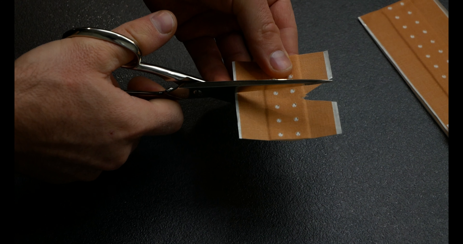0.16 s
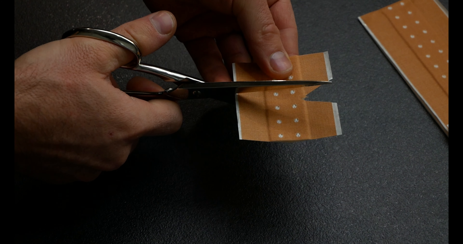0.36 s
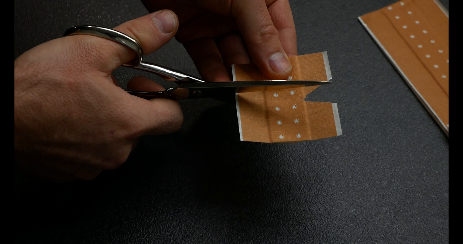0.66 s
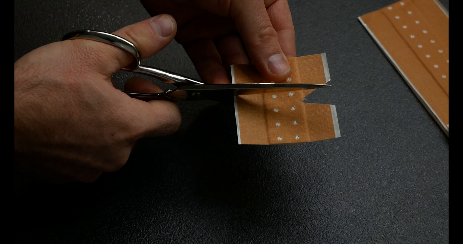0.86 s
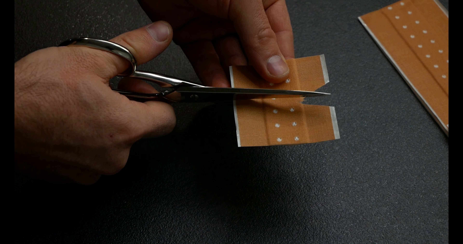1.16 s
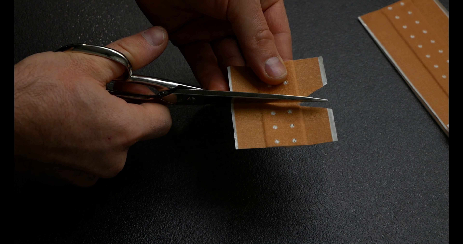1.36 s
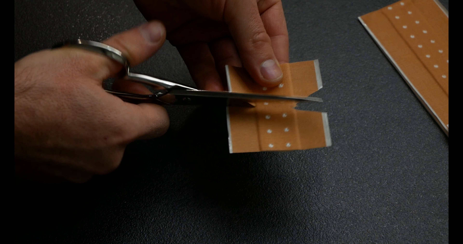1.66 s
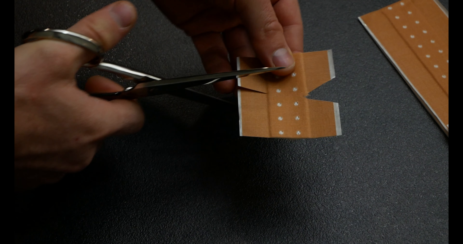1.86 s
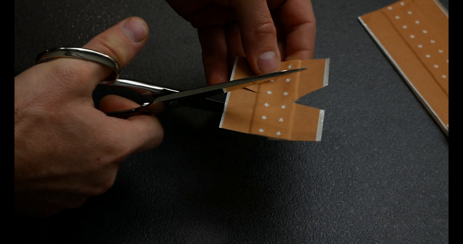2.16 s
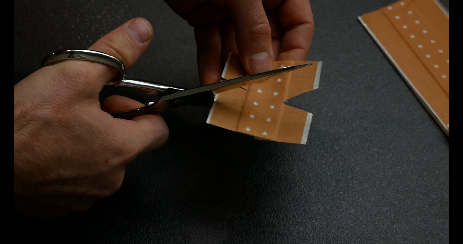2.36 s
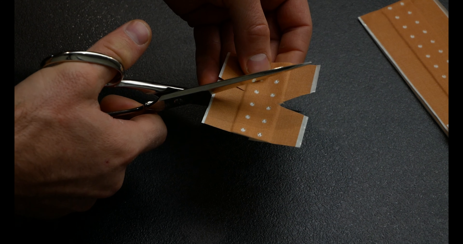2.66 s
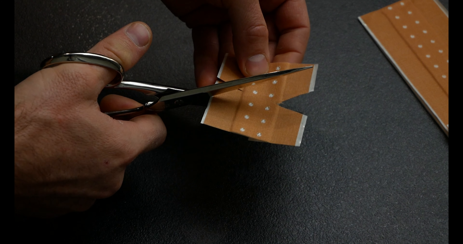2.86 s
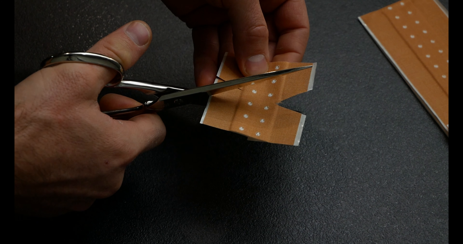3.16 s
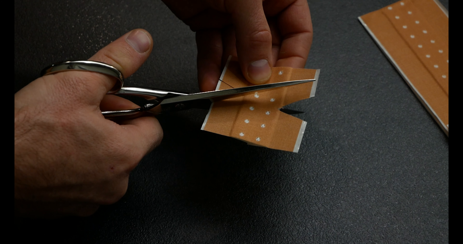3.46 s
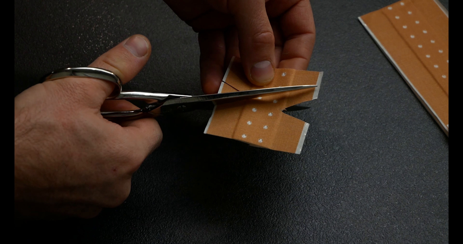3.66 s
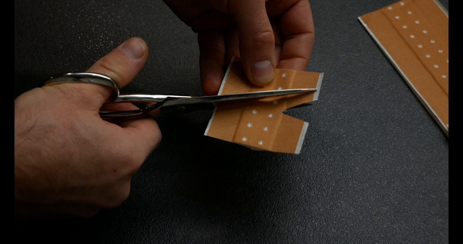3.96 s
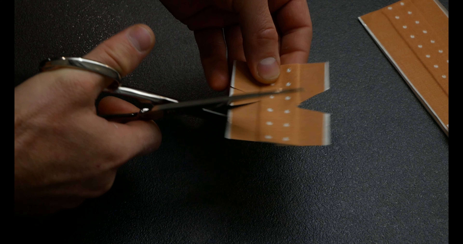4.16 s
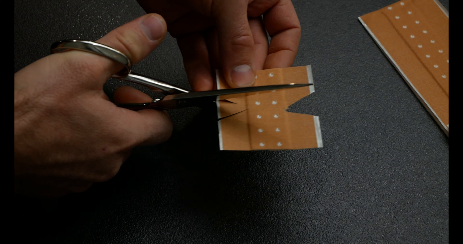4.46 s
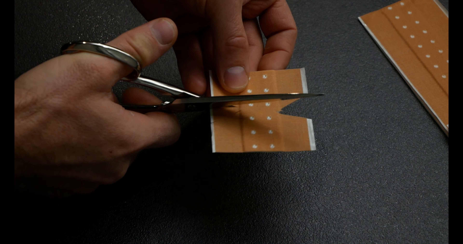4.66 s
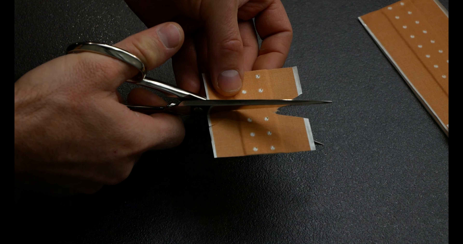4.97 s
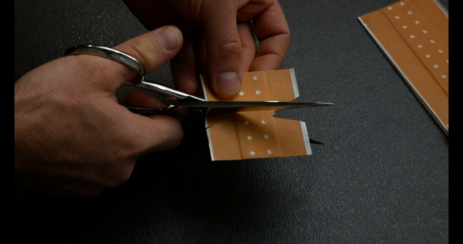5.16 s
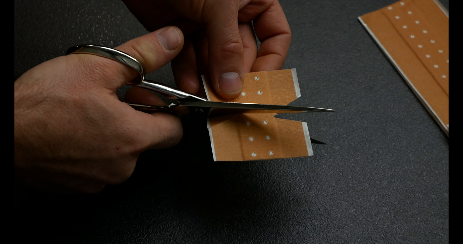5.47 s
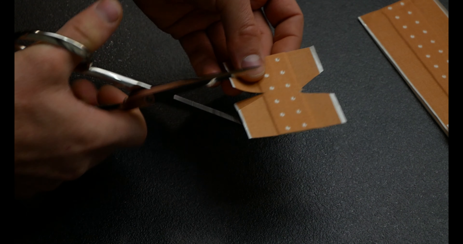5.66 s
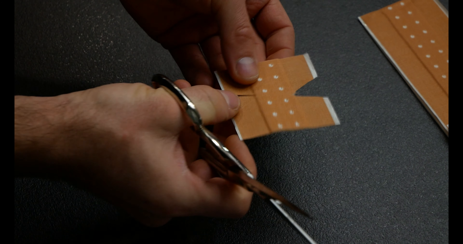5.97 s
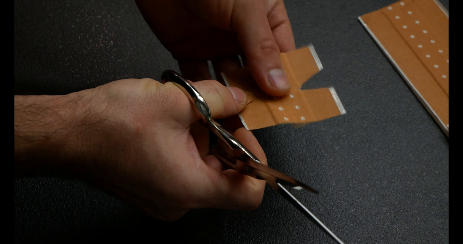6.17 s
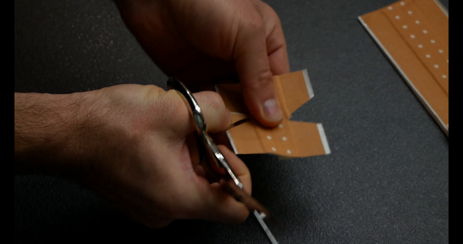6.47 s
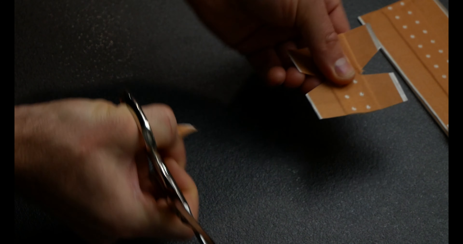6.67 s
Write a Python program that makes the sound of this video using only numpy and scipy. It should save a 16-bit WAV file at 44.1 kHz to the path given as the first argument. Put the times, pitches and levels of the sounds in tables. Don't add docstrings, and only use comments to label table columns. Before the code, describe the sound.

Close dry snipping with fine fibre crackles, sharp metal ticks and soft blade slides over faint hum, ending in one loud scissor snap.

```python
import sys
import numpy as np
from scipy import signal
from scipy.fft import irfft, next_fast_len
from scipy.io import wavfile
from scipy.ndimage import uniform_filter1d

SR = 44100
rng = np.random.default_rng(int(sys.argv[2]) if len(sys.argv) > 2 else 0)


def wrap_up_sound(samples):
    columns = np.atleast_2d(samples).T
    tamed = np.clip(columns, -1, 1)
    steps = np.round(tamed * 32767).astype(np.int16)
    wavfile.write(sys.argv[1], SR, steps)


def voltage_ratio(level):
    return 10 ** (np.asarray(level, float) / 20)


N = 300264

# time in seconds, level in dB.
CUTS = [
    [(0.86, -80), (0.92, -55), (1.0, -61), (1.06, -57), (1.33, -52), (1.4, -52), (1.46, -58), (1.49, -54),
     (1.54, -72)],
    [(3.34, -82), (3.42, -55), (3.56, -58), (3.78, -54), (3.85, -51), (3.95, -53), (4.01, -53),
     (4.064, -63), (4.13, -66)],
]
CONTACT_HZ = 5200
ROOM_DB = -8.5


def evened(x):
    return x / np.sqrt(np.mean(x ** 2) + 1e-20)


def peaked(x, db):
    return voltage_ratio(db) * x / abs(x).max()


def read(points, hz):
    f, value = np.transpose(points)
    return np.interp(np.log(hz + 1), np.log(f + 1), value)


def add(mix, s, sound):
    part = mix[..., max(round(s * SR), 0):][..., :sound.shape[-1]]
    part += sound[..., :part.shape[-1]]


def no_bass(x, size):
    return x - uniform_filter1d(x, size=size, axis=-1)


def ring(modes):
    t = np.arange(600) / SR
    h = np.zeros(600)
    for k, (hz, width, db) in enumerate(modes):
        decay = np.exp(-np.pi * width * t)
        h += (-1) ** k * voltage_ratio(db) * width * decay * np.sin(2 * np.pi * hz * t)
    return h / np.linalg.norm(h)


def stereo_spectrum(a, b, c, d, same):
    same = np.clip(same, -1, 1)
    left, other = a + 1j * b, c + 1j * d
    return np.array([left, same * left + np.sqrt(1 - same ** 2) * other])


def floor():
    # frequency in Hz, density in dB per Hz.
    colour = [(88, -41), (150, -5.5), (172, -17.5), (240, -13), (271, -19.5), (349, -18.5), (594, -19.5),
              (1230, -24.5), (1530, -29), (2870, -28.5), (3420, -31.5), (15000, -37), (16500, -52)]
    # frequency in Hz, left-right likeness from -1 to 1.
    likeness = [(60, 0.68), (130, 0.74), (290, 0.23), (640, 0.4), (1410, 0.28), (3100, 0.2), (6820, -0.15),
                (15000, -0.2)]
    frames, hz = N // 256 + 5, np.fft.rfftfreq(1024, 1 / SR)
    a, b, c, d, patches = rng.standard_normal((frames, 513, 5)).T
    patches = uniform_filter1d(patches, size=10, axis=0)
    patches = evened(uniform_filter1d(patches, size=12, axis=1))
    z = stereo_spectrum(a, b, c, d, read(likeness, hz)[:, None])
    z *= voltage_ratio(read(colour, hz)[:, None] + 0.54 * patches)
    hiss = signal.istft(z, nperseg=1024, noverlap=768)[1][:, :N]
    return voltage_ratio(-53.5) * evened(hiss)


def narrow(hz, width, same):
    size = next_fast_len(N)
    f = np.fft.rfftfreq(size, 1 / SR)
    pair = stereo_spectrum(*rng.standard_normal((4, len(f))), same)
    resonance = 1 / (1 + (2 * (f - hz) / (1.38 * width)) ** 2)
    return evened(irfft(pair * resonance, size)[:, :N])


def hum():
    # frequency in Hz, width in Hz, rms in dB, left-right likeness.
    modes = [(37.7, 8.7, -61, .7), (75.6, 11.7, -53.5, 0.76), (104.7, 25, -59.5, 0.86),
             (135.2, 15, -52, 0.88), (268.6, 35.6, -62.5, 0.45), (591, 22, -71.5, 0.66),
             (849, 27, -67.5, 0.65), (1199, 3, -70, 0.73)]
    # peak in seconds, level in dB, half length in seconds.
    passes = [(0.2, -58, .3), (1.36, -46, .13), (2.05, -51, .15), (2.6, -57, .4), (3.13, -46, .08),
              (3.37, -44, .09), (3.7, -56, .25), (4.08, -50, .06), (4.8, -59, .3), (5.42, -55, .1),
              (6.2, -55, .15), (6.7, -54, .12)]
    t = np.arange(N) / SR
    traffic = voltage_ratio(-66) + sum(voltage_ratio(db) * np.exp(-((t - s) / half) ** 2) for s, db, half in passes)
    rumble = voltage_ratio(-2) * traffic * narrow(35, 18, .6)
    return rumble + sum(voltage_ratio(db) * narrow(hz, width, same) for hz, width, db, same in modes)


def room(x, echoing):
    # frequency in Hz, t60 in seconds.
    decay = [(400, 0.52), (1200, .55), (2500, .6), (5000, .55), (9000, .42), (15000, .27)]
    # delay in ms, level in dB.
    bounces = [(3.2, -21), (5.6, -22.5), (8.8, -14), (14.3, -27.5), (17.6, -24.5), (23, -30)]
    taps = np.zeros((2, 30000))
    at = np.arange(100, 29000, 20) + rng.integers(0, 20, (2, 1445))
    np.put_along_axis(taps, at, rng.choice([-1., 1.], at.shape), 1)
    hz, t, z = signal.stft(taps, SR, nperseg=128)
    t60 = np.maximum(read(decay, hz), .05)[:, None]
    tail = signal.istft(z * voltage_ratio(-60 * t / t60), SR, nperseg=128)[1]
    tail = voltage_ratio(ROOM_DB) * (tail + .25 * tail[::-1]) / np.linalg.norm(tail[0])
    echoes = np.zeros((1, 2048))
    for ms, db in bounces:
        echoes[0, round(ms * SR / 1000)] = voltage_ratio(db)
    late = signal.fftconvolve(x[None], tail, axes=1)[:, :N]
    return late + signal.oaconvolve(echoing, echoes, axes=1)[:, :N]


def burst(ms, rise_ms):
    t = np.arange(1800) / SR * 1000 - 6
    envelope = np.exp(np.where(t < 0, t / max(rise_ms, .03), -t / max(ms, .05)))
    return envelope * rng.standard_normal((4, len(t)))


def blow(ms, rise_ms, scatter):
    chatter = scatter * burst(ms, rise_ms)
    return chatter + (np.arange(chatter.shape[1]) == round(.006 * SR))


def strike(force, parts, db, *rel_db):
    rung = signal.fftconvolve(force[:len(parts)], parts, axes=1)
    rung /= np.linalg.norm(rung, axis=1)[:, None]
    return peaked(voltage_ratio(rel_db) @ rung, db)


def thuds():
    # frequency in Hz, width in Hz, level in dB.
    loops = [(380, 150, -6), (570, 90, 0), (930, 130, 1)]
    # start in seconds, peak in dB, length in ms.
    knocks = [
        (4.172, -33, 32),
        (6.4136, -36, 5),
        (3.9445, -38, 3),
    ]
    out = np.zeros(N)
    for s, db, ms in knocks:
        add(out, s - .004, peaked(signal.fftconvolve(burst(ms, 1.5)[0], ring(loops)), db))
    return out


def ticks():
    # start in seconds, peak in dB, handle level in dB, centre in Hz.
    hits = [(0.6777, -38.5, -15, 8050), (0.921, -36, -24, 4410), (0.944, -37, -20, 4910),
            (0.9794, -47, -18, 6930), (1.065, -43, -21, 7330), (1.08, -38, -25, 6800),
            (1.6377, -33.5, -17, 8200), (1.7327, -36.5, -3, 3700), (2.9842, -41, -9, 3710),
            (3.1724, -41.5, -12, 3660), (3.8057, -31, -24, 6800), (3.9205, -38, -22, 6500),
            (3.9445, -13.5, -22, 4600), (4.133, -17.5, -14, 4900), (4.1425, -17, -24, 4830),
            (4.1474, -21, -20, 4880), (4.7711, -42, -10, 3660), (4.8877, -43, -6, 3630),
            (5.0174, -48, -12, 3620), (5.0594, -40, -8, 3710), (5.3956, -40, -23, 5020),
            (5.4625, -33.5, -19, 3840), (5.729, -27, -23, 3450), (6.1963, -43, -11, 5930),
            (6.4136, -21.5, -14, 4400), (6.5156, -32, -4, 4610), (6.5738, -24, -18, 6000)]
    out = np.zeros(N)
    handle = ring([(1150, 500, -3), (1750, 650, 0)])
    edge = ring([(10500, 2500, 0), (13500, 2500, -2)])
    for s, db, handle_db, hz in hits:
        blade = ring([(hz, 1000, 2), (5500, 1600, -1.5), (7500, 2000, -3)])
        edge_db = -13 + 3 * np.log2(hz / 5000)
        force = blow(.65, .15, .45)
        add(out, s - .0055, strike(force, [handle, blade, edge], db, handle_db + 14, 0, edge_db))
    return no_bass(out, 60)


def snap():
    # start in seconds, peak in dB, length in ms, level sent to the walls in dB.
    s, db, ms, around_db = (6.6101, 2.5, .5, -7)
    # frequency in Hz, width in Hz, level in dB.
    modes = [(1500, 500, -9), (2000, 700, 0), (4800, 700, 1), (5750, 700, 2.5), (7200, 700, -1),
             (9200, 1200, -3), (13400, 1300, -1), (15300, 2400, -11)]
    # frequency in Hz, level in dB.
    to_walls = [(300, -22), (600, -10), (1200, -4), (2200, -2), (3200, -6), (5000, 0), (9000, -5),
                (13000, -8), (16000, -15)]
    force, near, around = blow(ms, .22, .12), np.zeros((2, N)), np.zeros(N)
    apart = no_bass(force[1] - force[2], 5)
    pair = force[0] + .4 * np.outer([1, -1], apart)
    sound = no_bass(signal.fftconvolve(pair, [ring(modes)], axes=1), 50)
    add(near, s - .006, peaked(sound, db))
    click = np.fft.fftshift(irfft(voltage_ratio(read(to_walls, np.fft.rfftfreq(256, 1 / SR)))))
    click *= np.linalg.norm(near[0]) / np.linalg.norm(click)
    add(around, s - .001, voltage_ratio(around_db - ROOM_DB) * click)
    return near, around


def shares(weight_db):
    return voltage_ratio([[weight_db], [-5.5 + .5 * weight_db], [0], [-10.5 - .5 * weight_db]])


def swell(db, rise_ms, fall_ms):
    t = np.arange(-SR // 4, SR // 4) / SR * 1000
    roundness = 1.4
    return voltage_ratio(db) * np.exp(-abs(t / np.where(t < 0, rise_ms, fall_ms)) ** roundness)


def rubbing():
    cut_weight_db = [-6, -5]
    # peak in seconds, level in dB, rise and fall in ms, weight in dB.
    slides = [(1.775, -49, 22, 30, -4), (1.815, -47, 30, 35, 0), (1.862, -51, 20, 8, -5),
              (2.046, -57, 60, 35, -14), (2.19, -61, 30, 90, 0), (4.152, -48, 10, 20, -3),
              (4.187, -35.5, 12, 28, -1), (4.26, -60, 30, 50, 2), (4.34, -64, 35, 40, -22),
              (4.772, -63, 15, 25, 3), (4.9, -62, 35, 45, 9), (5.06, -69, 30, 30, 8),
              (5.33, -65, 60, 120, -7), (5.46, -61, 10, 20, -6), (5.614, -46, 4, 22, -6),
              (5.668, -51, 35, 18, 1), (5.712, -50, 7, 26, 14), (5.74, -49, 18, 8, 2),
              (5.8, -69, 30, 50, 11), (6.06, -63, 60, 50, 3), (6.26, -58, 60, 40, -5),
              (6.385, -63, 15, 15, 8), (6.46, -58, 20, 50, -2), (6.54, -58, 30, 30, -3)]
    # peak in seconds, level in dB, rise in ms, fall in ms.
    chatter = [(2.19, -62, 25, 90), (3.42, -59, 25, 40), (3.5, -57, 20, 40), (3.955, -51, 6, 35),
               (4.174, -43, 3, 10), (4.3, -65, 60, 70), (4.9, -62, 30, 45), (5.02, -63, 8, 10),
               (5.14, -63, 8, 10), (5.466, -58, 4, 20), (5.613, -46, 4, 25), (5.72, -47, 15, 25),
               (6.08, -68, 40, 30)]
    rub = np.zeros((4, N))
    for rows, weight_db in zip(CUTS, cut_weight_db):
        s, db = np.transpose(rows)
        t = np.arange(s[0], s[-1], 1 / SR)
        effort = voltage_ratio(np.interp(t, s, db)) * signal.windows.tukey(len(t), .08)
        add(rub, s[0], shares(weight_db) * effort)
    for s, db, rise_ms, fall_ms, weight_db in slides:
        add(rub, s - 1 / 4, shares(weight_db) * swell(db, rise_ms, fall_ms))
    for s, *shape in chatter:
        add(rub[1], s - 1 / 4, swell(*shape))
    return rub


def grit(count, per_s, spread_db):
    size = voltage_ratio(spread_db * np.minimum(rng.exponential(1, count), 4))
    slips = size * (rng.random(count) < per_s / SR)
    own, steady = rng.standard_normal((4, count)), rng.standard_normal((4, count))
    return evened(slips * own + 0.21 * steady)


def along_cuts():
    # Hz at the start of a cut, Hz at its end.
    sing_hz = [(6300, 6900), (6600, 5000)]
    # dB at the root, dB at the tip.
    root_to_tip_db = [(-4, 4), (0, 6)]
    tip_db, lift_hz = np.zeros(N), np.zeros(N)
    for rows, hz, ends_db in zip(CUTS, sing_hz, root_to_tip_db):
        count = round((rows[-1][0] - rows[0][0]) * SR)
        add(tip_db, rows[0][0], np.linspace(*ends_db, count))
        add(lift_hz, rows[0][0], np.linspace(*hz, count) - CONTACT_HZ)
    return voltage_ratio(tip_db), lift_hz


def resonate(x, hz, width):
    turn = np.exp(2j * np.pi * np.cumsum(hz) / SR)
    r = np.exp(-np.pi * width / SR)
    return 2 * (turn * signal.lfilter([1 - r], [1, -r], x / turn)).real


def cutting():
    # start in seconds, peak in dB,
    # weight in dB.
    fibre_tears = [(1.037, -37.5, -8), (1.1069, -37, -9), (1.1368, -37, -10), (1.1892, -31, -10),
                   (1.2186, -32, -9), (1.2461, -44, -3), (1.2645, -33, -8), (1.3024, -32, -11),
                   (1.3269, -31.5, -10), (1.3474, -40, -10), (1.3862, -30.5, -7), (1.4137, -31, -7),
                   (1.421, -36, -4), (1.48, -35.5, -4), (1.4994, -44, -5),
                   (3.3892, -47, -1), (3.4106, -40, -4), (3.4491, -40, -9), (3.481, -41, -2),
                   (3.4979, -34, -6), (3.5204, -41.5, -2), (3.5823, -39, -5), (3.6167, -36.5, -9),
                   (3.6496, -35.5, -11), (3.693, -48, -3), (3.7214, -39, -7), (3.7723, -40, -1),
                   (3.8057, -30, -8), (3.8477, -33, -13), (3.8654, -35, -6), (3.8995, -34, -1),
                   (4.0043, -35, 1), (4.2094, -40, -7), (5.6092, -32, -6)]
    # start in seconds, peak in dB, weight in dB, length in ms.
    jerks = [
        (4.1714, -28, 3, 14),
        (5.704, -41, 14, 14),
    ]
    # frequency in Hz, width in Hz, level in dB.
    handle_modes = [(596, 114, -14), (977, 170, -9), (1300, 220, -2), (1620, 250, 2), (1960, 300, -3),
                    (2500, 600, -10)]
    pivot_modes = [(3322, 330, -4.5), (3700, 250, 2.5)]
    blade_modes = [(4350, 430, -1), (4880, 300, 3), (5650, 420, 0.5), (6300, 430, 0.5), (6940, 400, 1.5),
                   (7460, 260, 2.5), (7990, 310, -0.5), (8550, 400, -3.5)]
    edge_modes = [(8940, 400, 3), (10260, 600, -0.5), (11700, 600, -1), (12650, 700, -2), (13800, 500, -3),
                  (15200, 1200, -10)]

    rub, tear, dip = rubbing(), np.zeros((4, N)), np.zeros(N)
    tip, lift_hz = along_cuts()
    weight_db = 20 * np.log10((rub[0] + 1e-7) / (rub[2] + 1e-7))
    contact_hz = CONTACT_HZ + lift_hz - 40 * weight_db * (lift_hz == 0)
    tears = fibre_tears
    for s, db, weight, ms in [(*row, 6) for row in tears] + jerks:
        add(tear, s - .0045, voltage_ratio(db - 10) * shares(weight) * burst(ms, 3))
    for s, *_ in tears:
        add(dip, s - .03, signal.windows.hann(M=2600))
    force = rub * grit(N, 3500, 3.6) * voltage_ratio(-5.5 * np.minimum(dip, 1)) + tear
    parts = [ring(modes) for modes in (handle_modes, pivot_modes, blade_modes, edge_modes)]
    handle, pivot, blade, edge = signal.oaconvolve(force, parts, axes=1)[:, :N]
    return handle + .9 * pivot + .55 * blade + .7 * resonate(blade, contact_hz, 1800) + tip * edge


def scene():
    background = floor() + hum()
    near, around = snap()
    steel = cutting() + ticks() + thuds()
    direct = steel * voltage_ratio([[-.22], [.22]]) + near
    return direct + room(voltage_ratio(-3) * steel + around, direct) + background


def low_pass(x):
    return signal.sosfilt(signal.butter(12, 16730, fs=SR, output="sos"), x)


def record(dry):
    x = np.clip(dry, -1, 1)
    lowpass = signal.firwin(255, 15750, window=("kaiser", 8), fs=SR)
    low = signal.oaconvolve(x, lowpass[None], "same")
    top = x - low
    power = (top ** 2).mean(0)
    quick, slow = uniform_filter1d(power, size=100), uniform_filter1d(power, size=1500)
    keep = uniform_filter1d(1. * (quick > 3 * slow + 1e-6), size=200)
    return low_pass(low + keep * top)


dry = scene()
out = record(dry)
wrap_up_sound(out)
```